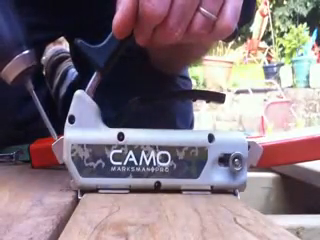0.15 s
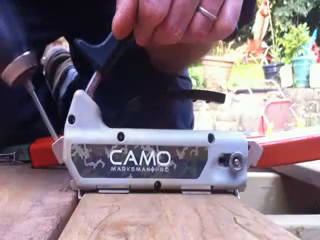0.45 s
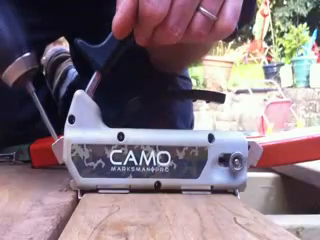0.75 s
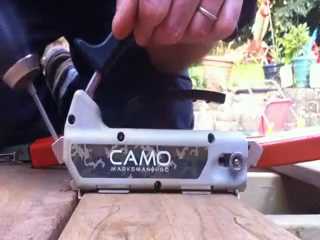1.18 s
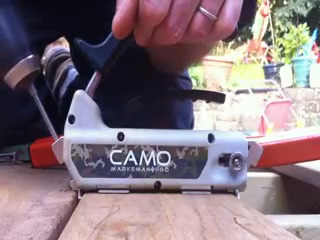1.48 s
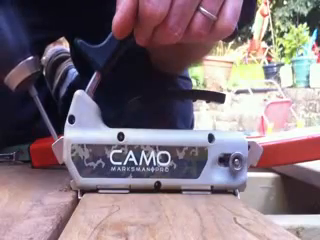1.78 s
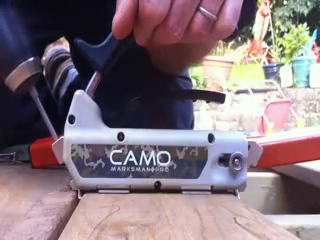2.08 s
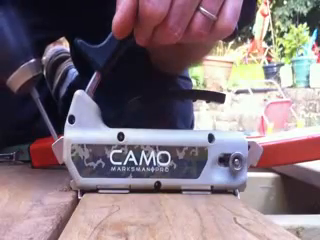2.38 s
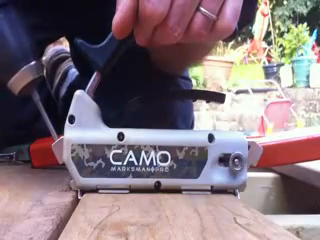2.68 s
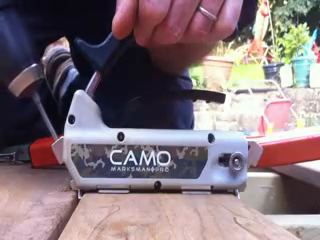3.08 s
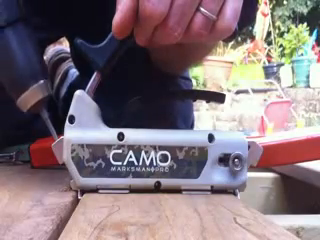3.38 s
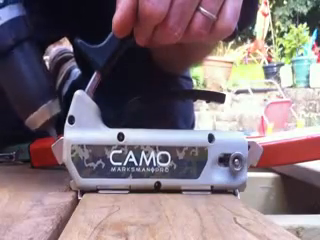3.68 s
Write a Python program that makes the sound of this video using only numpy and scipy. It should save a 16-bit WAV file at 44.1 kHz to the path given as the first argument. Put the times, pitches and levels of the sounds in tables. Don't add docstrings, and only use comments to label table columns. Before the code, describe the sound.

Power drill at full speed, high gritty whine, sagging in pitch as the screw head seats in wood.

```python
import sys
import numpy as np
from scipy import signal
from scipy.fft import rfft, irfft, next_fast_len
from scipy.io import wavfile
from scipy.ndimage import uniform_filter1d, minimum_filter1d, map_coordinates

SR = 44100
rng = np.random.default_rng(int(sys.argv[2]) if len(sys.argv) > 2 else 0)


def materialize(psi):
    bounded = np.clip(np.atleast_2d(psi).T, -1, 1)
    quanta = np.round(bounded * 32767).astype(np.int16)
    wavfile.write(sys.argv[1], SR, quanta)


def ratio(d):
    e = np.asarray(d, float) / 20
    return 10 ** e


N = 169785


def unit(x):
    return x / np.sqrt(np.mean(x ** 2) + 1e-20)


def curve(rows):
    s, value = np.transpose(rows)
    return np.interp(np.arange(N) / SR, s, value)


def wobble(rate):
    knots = rng.standard_normal(int(N / SR * 400) + 4)
    return map_coordinates(knots, [np.arange(N) * min(rate, 390) / SR])


def filtered(x, response):
    size = next_fast_len(N + 8192)
    hz = np.fft.rfftfreq(size, 1 / SR)
    return irfft(rfft(x, size) * response(hz), size)[..., :N]


def colour(points):
    f, db = np.transpose(points)
    return lambda hz: ratio(np.interp(np.log(hz + 1), np.log(f + 1), db, -120, -120))


def peak(f, hz, width_hz):
    return 1j * f * width_hz / (hz * hz - f * f + 1j * f * width_hz)


def modes(rows):
    return lambda f: sum(ratio(db) * peak(f, hz, width) ** 2 for hz, width, db in rows)


def shaft():
    # start_s, speed_hz
    speed_rows = [(0.0, 357.4), (0.38, 358.6), (0.52, 356.9), (0.75, 356.3), (1.15, 354.1), (1.5, 354.0),
                  (1.97, 352.4), (2.1, 352.6), (2.5, 351.9), (2.72, 348.7), (2.95, 350.3), (3.3, 349.3),
                  (3.5, 347.0), (3.62, 345.1), (3.7, 340.7), (3.76, 334.2), (3.81, 326.2), (3.85, 314.2)]
    stall_hz = 345
    speed = uniform_filter1d(curve(speed_rows), size=1500, mode="nearest")
    speed = speed * (1 + 0.0009 * wobble(14))
    return speed, np.cumsum(speed) / SR, np.maximum(stall_hz - speed, 0)


def thread_slips():
    # start_s, peak_db, pitch_hz
    slips = [(2.528, -23, 711), (2.546, -17.5, 790), (2.618, -21, 700), (2.634, -17, 754),
             (2.715, -25, 730), (2.746, -19, 724), (2.77, -20, 740), (2.81, -17, 730), (2.858, -19, 700),
             (2.9, -17.5, 736), (2.985, -18, 756), (3.5, -20, 690), (3.566, -18, 832), (3.619, -18.5, 687),
             (3.674, -17.5, 820), (3.783, -12.5, 770), (3.794, -19, 747)]
    out = np.zeros(N + SR)
    t = np.arange(SR // 8) / SR
    knocks = [(s, db + 3, hz, 0.043) for s, db, hz in slips]
    knocks.append((3.555, -22, 340, 0.11))
    for s, db, hz, t60_s in knocks:
        ring = (1 - np.exp(-t / 0.003)) ** 2 * ratio(db - 60 * t / t60_s)
        out[round(s * SR):][:len(t)] += ring * np.sin(2 * np.pi * hz * t)

    squeal_s, squeal_hz, squeal_db, rise_s = 3.824, 790, -16.5, 0.0099
    held = (1 - np.exp(-t / rise_s)) * np.sin(2 * np.pi * squeal_hz * t)
    out[round(squeal_s * SR):][:len(t)] += np.sqrt(2) * ratio(squeal_db) * held
    return out[:N]


def squeak():
    middle_s, long_s, pitch_hz, level_db = 3.74, 0.03, 5190, -26
    now = np.arange(N) / SR
    swell = np.exp(-((now - middle_s) / long_s) ** 4)
    return swell * ratio(level_db + 2 * wobble(80)) * np.sin(2 * np.pi * pitch_hz * now)


def bite():
    # start_s, level_db
    bite_level = [
        (0, -62),
        (3.42, -50),
        (3.55, -31),
        (3.7, -32.5),
        (3.85, -32),
    ]
    # pitch_hz, width_hz, level_db
    bite_modes = [(199, 90, -5.5), (500, 160, -2), (780, 210, 2.5), (1400, 310, -2.5)]
    crush = rng.standard_normal(N) * ratio(3.1 * wobble(40))
    return ratio(curve(bite_level)) * unit(filtered(crush, modes(bite_modes)))


def rattle(turns, sag):
    # pitch_hz, density_db (per Hz)
    fizz_colour = [(3300, -23), (4200, -3.5), (4900, -9), (5600, -7), (6500, -10), (8400, -14), (9400, -17),
                   (10700, -21)]
    # pitch_hz, density_db (per Hz)
    hum_colour = [(60, -53), (130, -8), (250, -7.5), (480, -8.5), (1000, -4.5), (2100, -1), (3200, -2),
                  (3600, -28)]
    # pitch_hz, width_hz, level_db
    housing = [(3630, 460, 2), (3870, 176, 6), (4210, 380, 2), (4590, 600, -2), (5327, 290, -1.5)]
    # pitch_hz, width_hz, level_db
    joists = [(133.5, 26, -8.5), (195.4, 14, 1.5), (237, 24, 4), (91.5, 33, -14.5)]
    board_mode = [(740, 180, 0)]

    def gate(order):
        return 1 + 0.33 * np.cos(2 * np.pi * order * turns)

    noise = rng.standard_normal((5, N))
    fizz = unit(filtered(noise[0] * gate(2) * ratio(0.68 * wobble(250)), colour(fizz_colour)))
    shell = unit(filtered(noise[1] * ratio(1.8 * wobble(100)), modes(housing)))
    hum = unit(filtered(noise[2] * gate(1), colour(hum_colour)))
    board = unit(filtered(noise[3] * ratio(3.9 * wobble(21.73)), modes(board_mode)))
    deck = unit(filtered(noise[4] * ratio(1.5 * wobble(5)), modes(joists)))

    out = ratio(-23 + 0.4 * wobble(9)) * fizz
    out += ratio(-25 + 0.32 * wobble(8)) * shell
    out += ratio(-29 + 0.11 * sag) * hum
    out += ratio(-44.5 + 0.14 * sag) * board
    return out + ratio(-50.5) * deck


def tone(order, turns, db, flutter_db):
    swing = flutter_db * (wobble(24.75) + 0.42 * wobble(120))
    return np.sqrt(2) * ratio(db + swing) * np.sin(2 * np.pi * (order * turns + rng.random()))


def motor(speed, turns, sag):
    shaft_orders = [1, 2, 3, 4, 5, 6, 7, 8, 9, 13, 14, 15, 16, 19, 20, 21, 22, 24, 25, 26, 27]
    shaft_db = [-41, -47, -44, -51, -51, -46, -39, -43, -46, -46, -38, -47, -44, -47, -51, -49, -51, -53,
                -57, -48, -55]
    gear_orders = [2.125, 2.458, 26 / 3, 11.115, 11.979, 38 / 3, 50 / 3]
    gear_db = [-51, -51, -51, -40, -39, -45, -48]
    out = tone(1, turns, shaft_db[0], flutter_db=0.3)
    for order, db in [*zip(shaft_orders[1:], shaft_db[1:]), *zip(gear_orders, gear_db)]:
        out = out + tone(order, turns, db, flutter_db=2.5)

    chirp_order = 46 / 3
    chirp = tone(chirp_order, turns, -37 + 2 * wobble(12), flutter_db=3)
    chirp = chirp * np.abs(peak(chirp_order * speed, 5330, 260))
    return ratio(-0.34 * sag) * out + chirp


def whine(speed, turns, sag):
    whine_orders = [10, 32 / 3, 34 / 3]
    whine_db = [-20.5, -18.3, -27.5]
    whine_flutter = [1.3, 1.2, 3]
    low, mid, high = [tone(order, turns, db + 0.3 * wobble(4.3), flutter)
                      for order, db, flutter in zip(whine_orders, whine_db, whine_flutter)]

    chuck_ratio = 1 / 16
    beat = 1 + 0.18 * np.cos(2 * np.pi * chuck_ratio * turns)
    shell_hz, shell_width_hz, direct = 3692, 140, 0.35
    mode = np.abs(peak(whine_orders[1] * speed, shell_hz, shell_width_hz)) ** 2 + direct

    cruise_hz = 353
    high_db = -0.4 * sag + 0.3 * (speed + sag - cruise_hz)
    return low * ratio(-0.07 * sag) + mid * beat * mode + high * ratio(high_db)


def faint_bands_lost(x):
    # pitch_hz, threshold_db
    band_floor = [(2900, -30), (3000, -7.5), (3350, -9), (3500, -14), (5500, -6.5), (6800, -3.8),
                  (8500, -2.5), (10500, -.7)]
    # pitch_hz, threshold_db
    grain_floor = [(4500, -20), (7000, -7), (10700, -1)]
    edge_hz, edge_open = 10440, 0.3
    hz, t, z = signal.stft(x, SR, nperseg=2048)
    power = np.abs(z) ** 2
    near = uniform_filter1d(uniform_filter1d(power, size=4, axis=0), size=3, axis=1)
    slow = uniform_filter1d(power, size=9, axis=1)
    wide = np.exp(uniform_filter1d(np.log(slow + 1e-14), size=40, axis=0))

    keep = near > wide * colour(band_floor)(hz)[:, None] ** 2
    keep = minimum_filter1d(keep, size=2, axis=1)
    keep &= power > wide * colour(grain_floor)(hz)[:, None] ** 2
    frame = np.minimum(t * SR, N - 1).astype(int)
    keep &= (hz[:, None] < edge_hz) | (wobble(17)[frame] > edge_open)
    return signal.istft(z * keep, SR, nperseg=2048)[1][:N]


def scene():
    # start_s, level_db
    load = [(0, -0.5), (.6, 0.5), (1.5, 0.5), (2.4, 1), (3.0, 1), (3.6, 0.5), (3.75, 1), (3.85, 0.5)]
    # pitch_hz, width_hz, depth (0-1)
    notches = [(3250, 150, .2), (6850, 90, .5), (7400, 70, .25), (7900, 70, .3), (8750, 220, .28),
               (9450, 110, .4), (10000, 110, .3), (10560, 200, .6)]

    def dips(f):
        return np.prod([1 - np.clip(depth, 0, 1) * peak(f, hz, width) for hz, width, depth in notches], axis=0)

    speed, turns, sag = shaft()
    screw = thread_slips() + squeak() + bite()
    drill = rattle(turns, sag) + motor(speed, turns, sag) + whine(speed, turns, sag)
    return np.tile(filtered(ratio(curve(load)) * drill + screw, dips), (2, 1))


def low_pass(x):
    return signal.sosfilt(signal.butter(12, 10760, fs=SR, output="sos"), x)


def record(dry):
    limited = filtered(dry[0], lambda hz: hz < 10690)
    mono = faint_bands_lost(limited)
    return low_pass(np.tile(mono, (2, 1)))


dry = scene()
out = record(dry)
materialize(out)
```